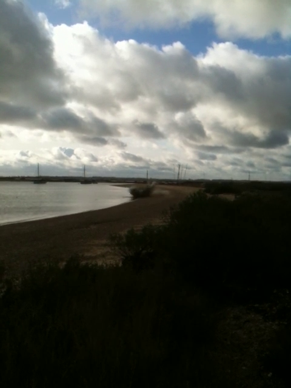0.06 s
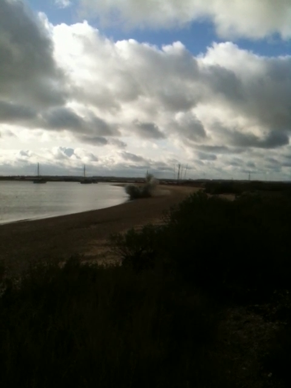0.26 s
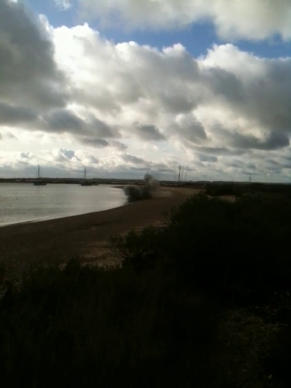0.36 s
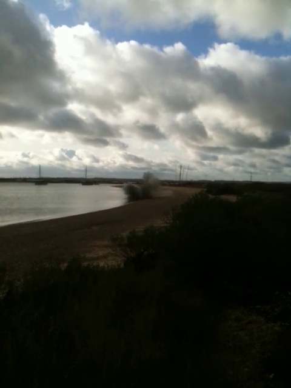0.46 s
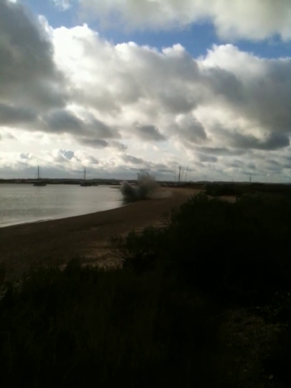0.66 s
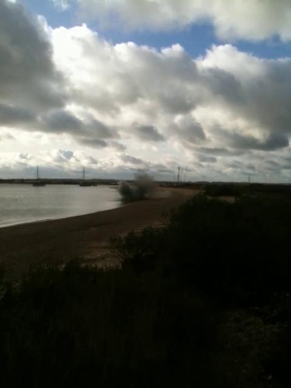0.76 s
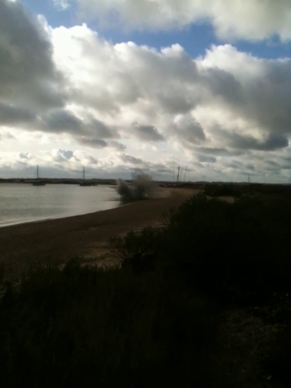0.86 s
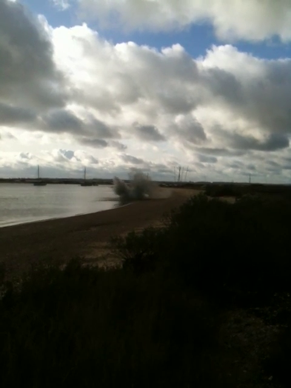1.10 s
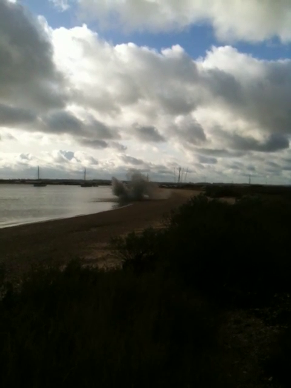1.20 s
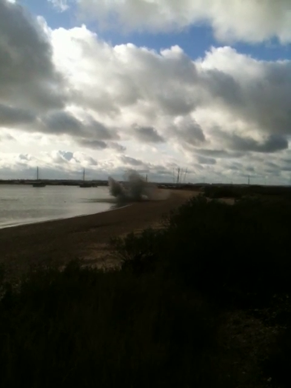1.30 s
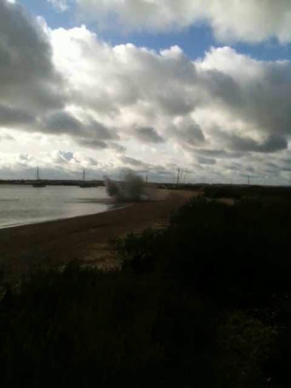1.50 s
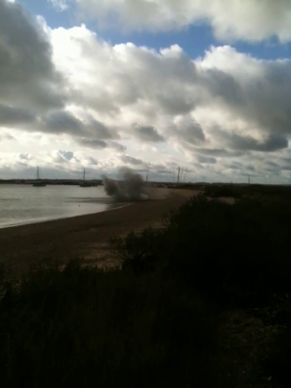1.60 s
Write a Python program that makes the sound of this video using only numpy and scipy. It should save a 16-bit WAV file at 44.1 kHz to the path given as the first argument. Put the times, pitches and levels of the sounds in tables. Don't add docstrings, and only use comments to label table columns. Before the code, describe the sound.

An explosion on an open shore, caught by a small overloaded microphone. Soft wind and water with tiny puffs until 0.23 s, then a harsh, tearing crack, choking and dropping out around 0.3 s into a short buzzing throb. Rumbling echoes roll back, with a sharp slap at 0.61 s, a stronger cluster of slaps and thumps at 1.1-1.2 s, and dull knocks and crackle around 1.4-1.6 s as it fades.

```python
import sys
import numpy as np
from scipy import signal
from scipy.io import wavfile
from scipy.ndimage import uniform_filter1d

SR = 44100
rng = np.random.default_rng(int(sys.argv[2]) if len(sys.argv) > 2 else 0)


def master(y):
    cut = np.clip(np.atleast_2d(y).T, -1, 1)
    pcm = np.round(cut * 32767)
    wavfile.write(sys.argv[1], SR, pcm.astype(np.int16))


def elevation(decibels):
    levels = np.asarray(decibels, float)
    return 10 ** (levels / 20)


N = 72765
TIME_S = np.arange(N) / SR
BLAST_S = 0.2297
RAIL = 0.73
CEILING_HZ = 11600


def read(points, hz):
    f, value_db = np.transpose(points)
    return np.interp(np.log(hz + 1), np.log(f + 1), value_db)


def evened(x):
    return x / np.sqrt(np.mean(x ** 2) + 1e-20)


def noise(field_db, patchy_db, flicker_db, size=512):
    frames = 4 * N // size + 5
    hz = np.fft.rfftfreq(size, 1 / SR)[:, None]
    real, imag, patches = rng.standard_normal((frames, len(hz), 3)).T
    gain = elevation(field_db(hz, np.arange(frames) * size / 4 / SR) + 0 * real)
    gain = gain / np.sqrt((gain ** 2).mean(0))
    patches = uniform_filter1d(patches, size=8, axis=0)
    patches = evened(uniform_filter1d(patches, size=8, axis=1))
    flicker = evened(uniform_filter1d(rng.standard_normal(frames), size=3))
    spectra = (real + 1j * imag) * gain * elevation(patchy_db * patches + flicker_db * flicker)
    sound = signal.istft(spectra, nperseg=size, noverlap=3 * size // 4)[1]
    return evened(sound[:N])


def level(s, db):
    return elevation(np.interp(TIME_S, s, db)) * (TIME_S > BLAST_S)


def bursts(rows, spread):
    out = np.zeros(N)
    u = np.arange(-1024, 1024) / SR
    for s, db, hz, length in rows:
        band = signal.butter(N=3, Wn=[hz / spread, hz * spread], btype="band", fs=SR, output="sos")
        grit = evened(signal.sosfilt(band, rng.standard_normal(2048)))
        shape = np.exp(-(2.4 * np.hypot(u, 0.3 / hz) - 0.6 * u) / length)
        wave = (np.sin(2 * np.pi * hz * u) + 0.35 * grit) * shape
        at = round(s * SR) - 1024
        out[at:at + 2048] += elevation(db) * wave / abs(wave).max()
    return out


def swings(rows):
    out = np.zeros(N)
    for s, length, direction, over_rail_db, skew in rows:
        part = np.clip((TIME_S - s) / length, 0, 1)
        out += direction * RAIL * elevation(over_rail_db) * np.sin(np.pi * part ** skew)
    return out


# pitch_hz [Hz], level_db [dB per Hz]
SHORE_COLOUR = [(40, 5), (150, 2.1), (300, -14.5), (650, -27), (920, -17.5), (1200, -25), (5000, -38),
                (15000, -30.5)]
# time_s [s], level_db [dB]
SHORE_SWELL = [
    (0, -7.5),
    (.06, -3.5),
    (.22, 0),
]


def shore():
    swell_db = np.interp(TIME_S, *np.transpose(SHORE_SWELL))

    def colour(hz, _):
        return read(SHORE_COLOUR, hz) - 12 * (hz / CEILING_HZ) ** 4
    return elevation(-46 + swell_db) * noise(colour, patchy_db=-1, flicker_db=0, size=1024)


# centre_s [s], peak_db [dB], pitch_hz [Hz], length_s [s]
PUFFS = [
    (.047, -39.5, 224, 0.0041),
    (.11, -50, 220, 0.012),
]


def puffs():
    return bursts(PUFFS, spread=1.8)


# pitch_hz [Hz], level_db [dB per Hz]
CRACK_COLOUR = [(59, -50), (100, -17.5), (784, -1), (1330, 5), (1680, -4.5), (3620, 2), (9410, -9),
                (16000, -10)]


def crack():
    hold_s, t60_s, crack_db = 0.0415, 0.018, 10
    t = TIME_S - BLAST_S
    shape = (t > 0) * elevation(crack_db - 60 * np.maximum(t - hold_s, 0) / t60_s)
    return shape * noise(lambda hz, _: read(CRACK_COLOUR, hz), patchy_db=6, flicker_db=4, size=256)


# start_s [s], length_s [s], direction [+1 push, -1 pull],
# over_rail_db [dB over the rail], skew [under 1 = fast rise]
HEAVE = [
    (.2715, .0185, 1, 8.5, .45),
    (.28465, .0228, -1, 20, .4),
    (.3066, .0045, 1, 5, .6),
    (.3090, .0105, -1, 9, 1.4),
    (.3168, .0105, 1, 12, .35),
    (.32535, .0075, -1, 9, .3),
]


def heave():
    return swings(HEAVE)


# time_s [s], level_db [dB], treble_db [extra dB at 6 kHz]
ROLL = [(.30, -4.5, 24), (.345, -9.5, 15), (.41, -11.5, 11), (.46, -13.5, 6.5), (.56, -19, 3.5),
        (.65, -22, 2), (.76, -25.5, 7.5), (.888, -22, 15), (.95, -25, 10.5), (1.029, -30.5, 9),
        (1.064, -25, 4), (1.105, -27.5, 8.5), (1.15, -23.5, -3.5), (1.205, -24.5, -3.5),
        (1.235, -26.5, -3.5), (1.42, -29.5, -3), (1.55, -30.5, -7), (1.65, -37.5, -9)]
# pitch_hz [Hz], level_db [dB per Hz]
NEAR_COLOUR = [(210, -52), (350, -17), (603, -6), (754, -4.5), (2170, -1.5), (2750, -8), (9900, -26.5),
               (16000, -51)]
# pitch_hz [Hz], level_db [dB per Hz]
FAR_COLOUR = [(250, -30), (400, -3), (700, -6.5), (1500, -7.5), (2200, -15.5), (3900, -22.5), (8700, -48.5),
              (16000, -22)]


def roll():
    near_s, far_s, dulling = 0.36, 2.07, 0.28
    s, db, treble_db = np.transpose(ROLL)

    def colour(hz, t):
        late_s = np.maximum(t - near_s, 0)
        far = (late_s / (far_s - near_s)) ** dulling
        lift = np.interp(t, s, treble_db) * np.sqrt(hz / 6000)
        top_loss = 45 * late_s * (hz / CEILING_HZ) ** 8
        blend = read(NEAR_COLOUR, hz) * (1 - far) + read(FAR_COLOUR, hz) * far
        return blend + lift - np.minimum(top_loss, 60) - 30 * (hz < 300)
    return level(s, db) * noise(colour, patchy_db=0.5, flicker_db=1.22, size=256)


def throb():
    start_s, length_s, pitch_hz = 0.3315, 0.048, 159.8
    t = TIME_S - start_s
    part = np.clip(t / length_s, 0, 1)
    shape = np.sin(np.pi * part ** 2) ** 0.1
    return elevation(-2.5) * shape * np.cos(2 * np.pi * pitch_hz * t + 2.6)


# time_s [s], level_db [dB]
BOOM = [(0.33, 12), (0.376, -12), (0.396, -14), (0.428, -12), (0.454, -17), (0.528, -17), (0.546, -17.5),
        (0.738, -20.5), (0.902, -19), (1.042, -27), (1.138, -16), (1.168, -21.5), (1.45, -30),
        (1.49, -26.5), (1.63, -32.5), (1.65, -56)]
# pitch_hz [Hz], level_db [dB per Hz]
BOOM_COLOUR = [(15, 13.5), (35, 2), (65, 10.5), (110, 11), (170, 1), (300, -5), (480, -11), (800, -54.5)]


def boom():
    lumps = noise(lambda hz, _: read(BOOM_COLOUR, hz), patchy_db=2.4, flicker_db=0.87, size=2048)
    entry = np.clip((TIME_S - 0.335) / 0.05, 0, 1)
    return elevation(5.5) * entry * level(*np.transpose(BOOM)) * lumps


# centre_s [s], peak_db [dB], pitch_hz [Hz], length_s [s]
SLAPS = [(.5925, -35, 10800, 0.00051), (.6018, -37, 10900, 0.00051), (.6109, 7.5, 2470, 0.0002),
         (.6112, -7, 990, 0.0018), (.611, -18, 8000, .0008), (.6215, -13, 2480, 0.0027),
         (.6255, -12, 1670, 0.0012), (.952, -14, 950, 0.0068), (1.062, -19.5, 1530, 0.005),
         (1.114, -19, 2400, 0.0013), (1.1315, -36, 360, 0.0035), (1.138, -22, 423, 0.012),
         (1.142, -16.5, 900, 0.0054), (1.151, -15, 1480, 0.0021), (1.162, -46, 1180, 0.002),
         (1.180, -8.5, 1100, 0.0018), (1.185, -6.5, 1030, 0.0011), (1.200, -8.5, 1140, 0.0031),
         (1.205, -11, 1230, 0.0015)]


def slaps():
    return bursts(SLAPS, spread=1.6)


# start_s [s], length_s [s], direction [+1 push, -1 pull],
# over_rail_db [dB over the rail], skew [1 = even]
LATE_HEAVE = [
    (1.0895, .009, 1, 1.5, 1),
    (1.097, .0085, -1, 3, 1),
    (1.1055, .009, 1, .5, 1),
    (1.1142, .0085, -1, 3, 1),
    (1.2585, .014, 1, .8, 1),
]


def late_heave():
    return swings(LATE_HEAVE)


# centre_s [s], peak_db [dB], pitch_hz [Hz], length_s [s]
THUMP = [
    (1.1435, -12, 1600, .0015),
    (1.1465, -6, 620, .003),
    (1.148, -14, 2200, .001),
]
# centre_s [s], peak_db [dB], pitch_hz [Hz], length_s [s]
KNOCKS = [(1.381, -17, 1800, .003), (1.455, -31, 4600, .002), (1.459, -31, 3600, .002),
          (1.462, -14, 1700, .0012), (1.488, -29, 4200, .001), (1.4952, -15, 3600, .0003),
          (1.4958, -17, 300, .004), (1.5055, -15, 1000, .001), (1.506, -25, 4200, .0003),
          (1.511, -30, 3800, .001), (1.547, -20, 1700, .0015), (1.556, -20, 1900, .0015),
          (1.560, -12, 1600, .0015), (1.575, -21, 1200, .002)]


def far_knocks():
    dull = signal.butter(N=4, Wn=6200, fs=SR, output="sos")
    return signal.sosfilt(dull, bursts([*THUMP, *KNOCKS], spread=1.9))


def scene():
    late = far_knocks() + late_heave()
    blast = crack() + heave() + throb()
    echoes = roll() + boom() + slaps()
    return (blast + echoes + late + shore() + puffs())[None]


def roll_off(x):
    return signal.sosfilt(signal.butter(12, 16900, fs=SR, output="sos"), x)


def record(dry):
    knee, limit = 8, 0.69
    railed = dry / (1 + abs(dry / RAIL) ** knee) ** (1 / knee)
    cut = signal.sosfilt(signal.butter(N=4, Wn=162, btype="high", fs=SR, output="sos"), railed)
    soft = signal.sosfilt(signal.butter(N=1, Wn=12000, fs=SR, output="sos"), cut)
    limited = np.clip(soft, -limit, limit)
    band_edge = signal.firwin(511, 16050, window=("kaiser", 9), fs=SR)
    edged = signal.oaconvolve(limited, band_edge[None], "same")
    return roll_off(edged)


dry = scene()
out = record(dry)
master(out)
```